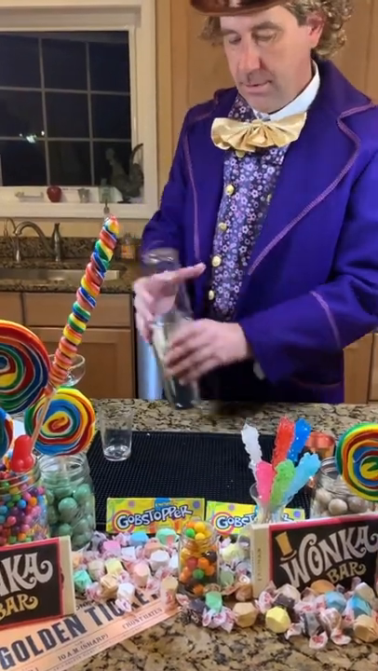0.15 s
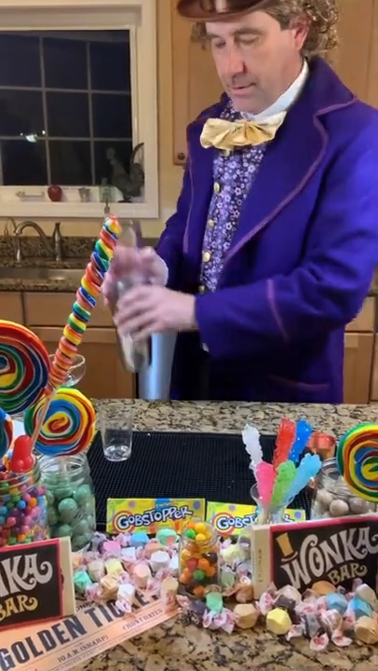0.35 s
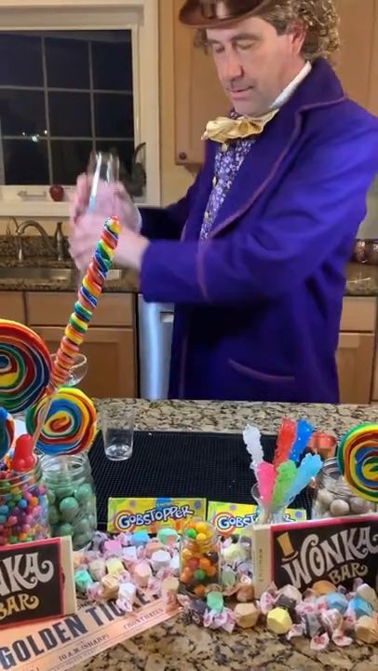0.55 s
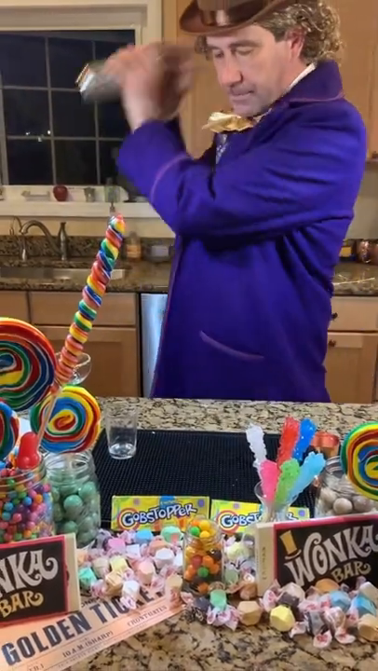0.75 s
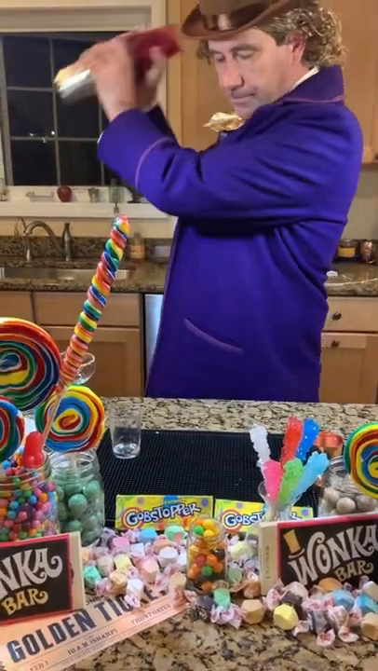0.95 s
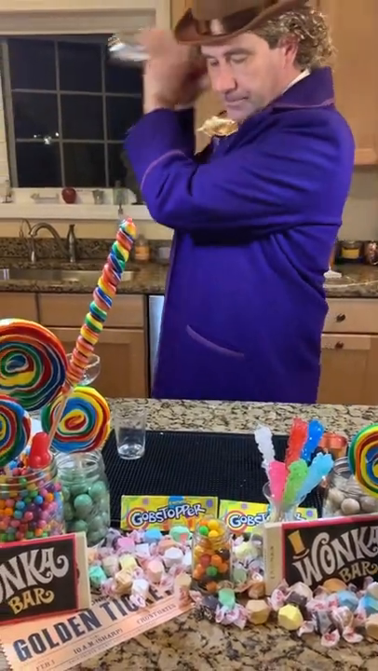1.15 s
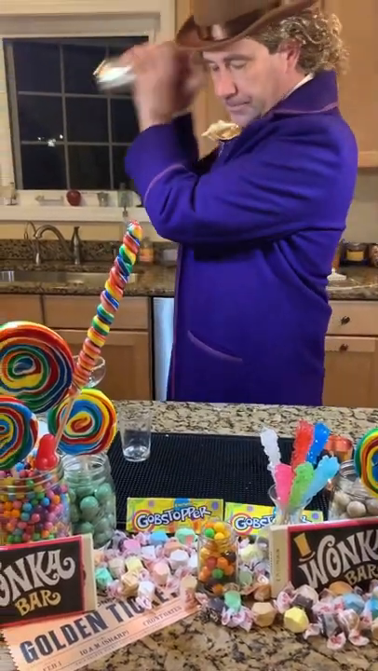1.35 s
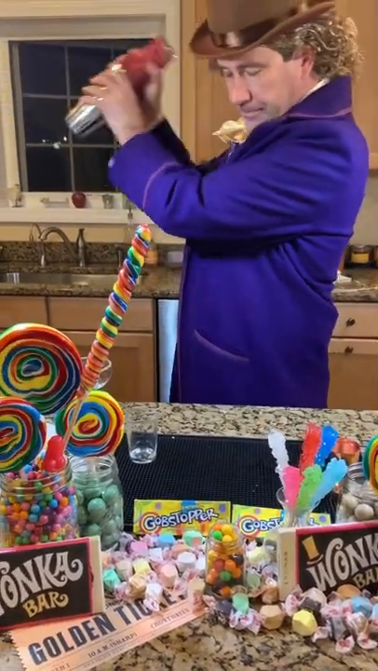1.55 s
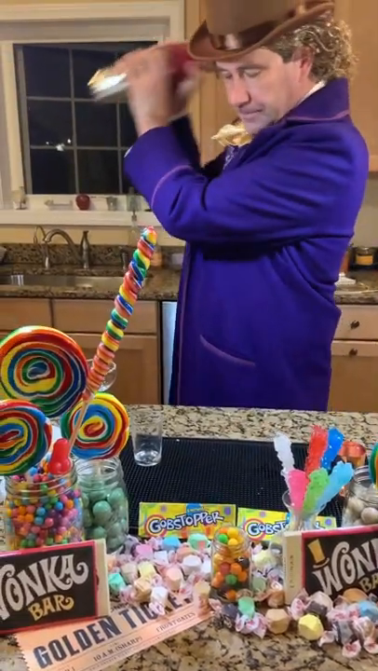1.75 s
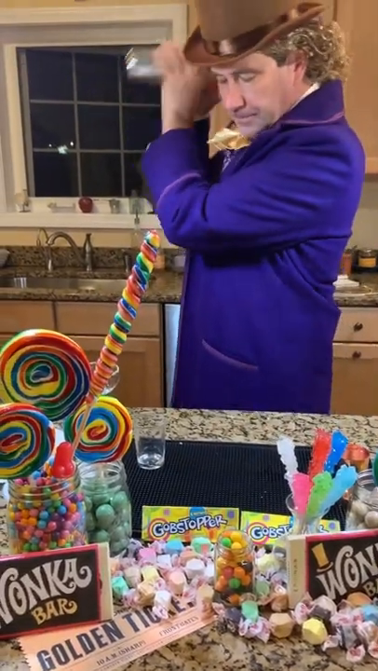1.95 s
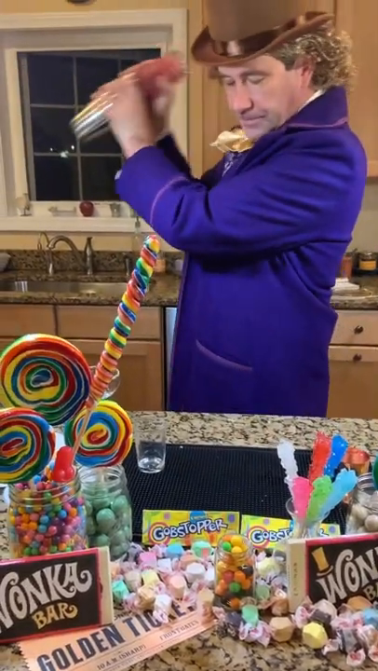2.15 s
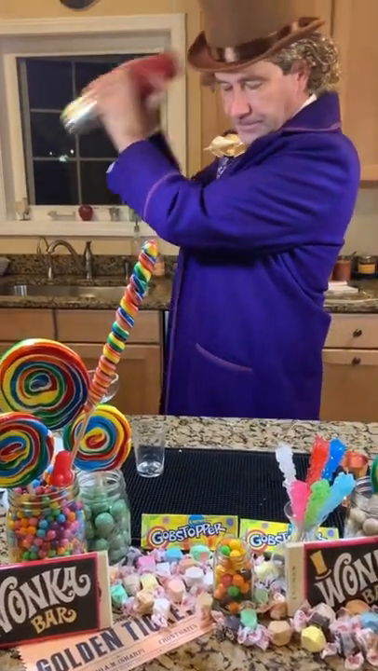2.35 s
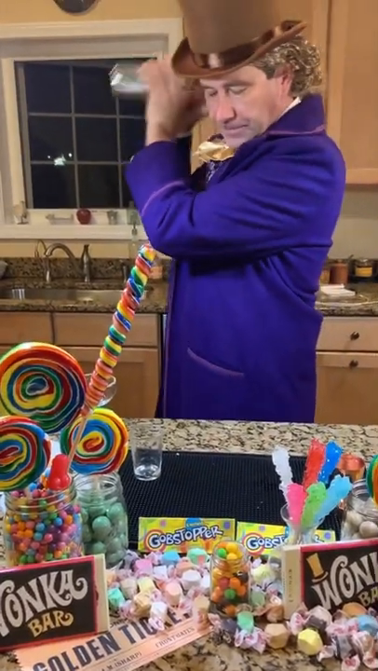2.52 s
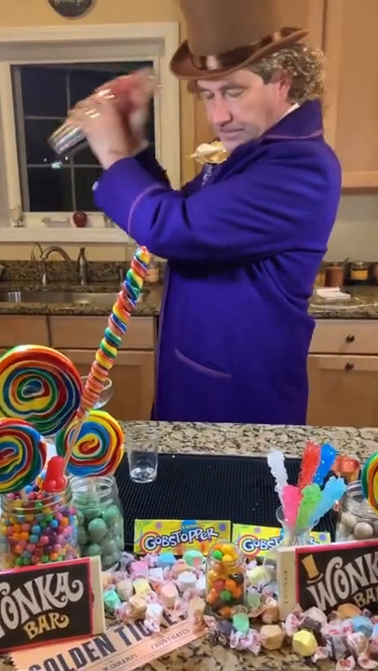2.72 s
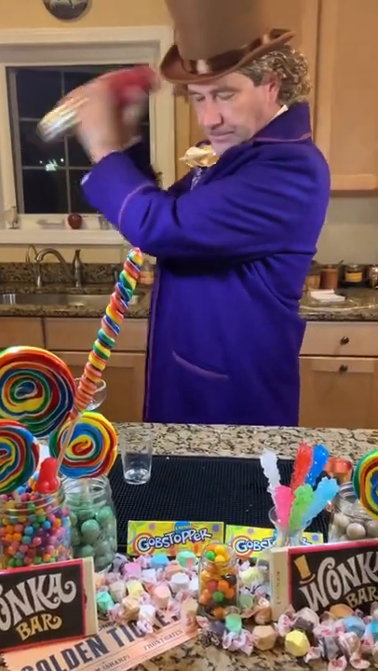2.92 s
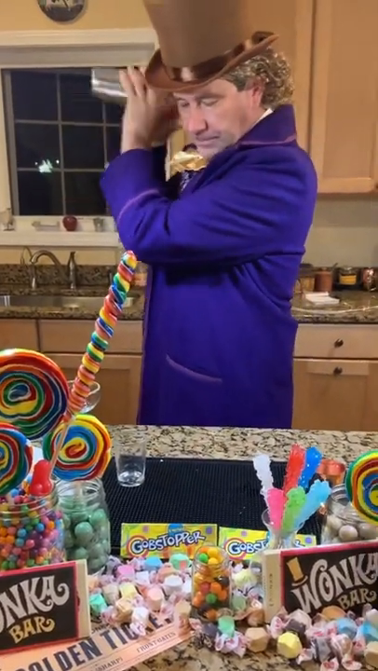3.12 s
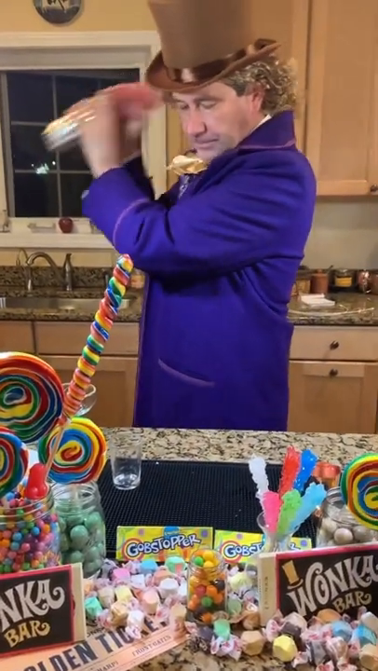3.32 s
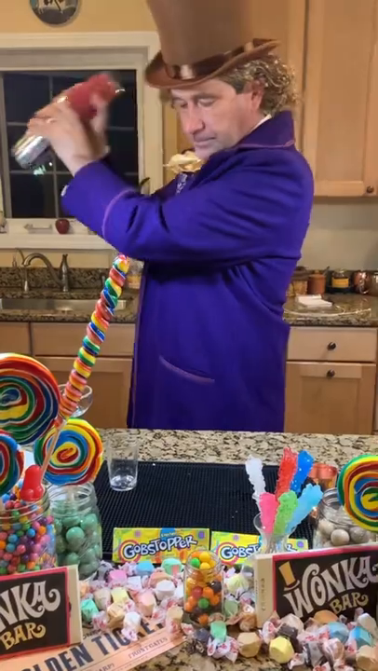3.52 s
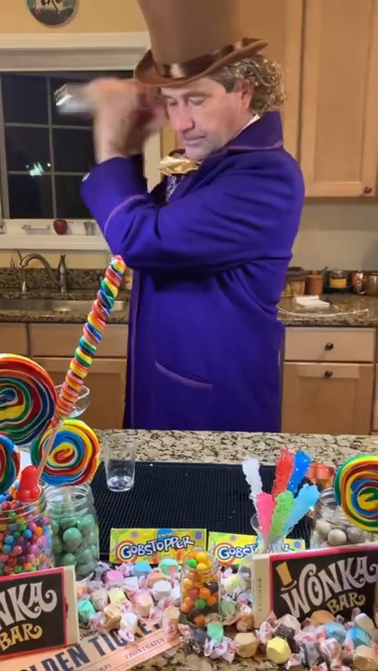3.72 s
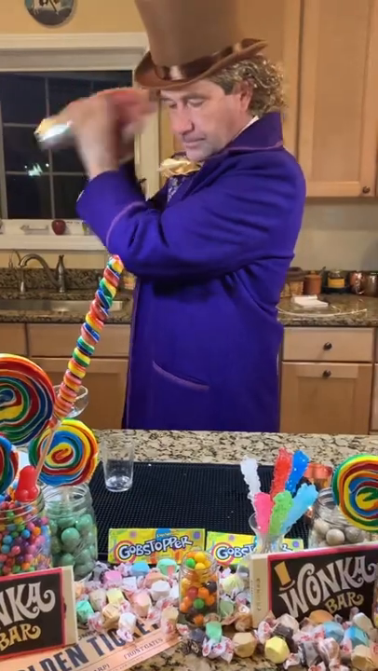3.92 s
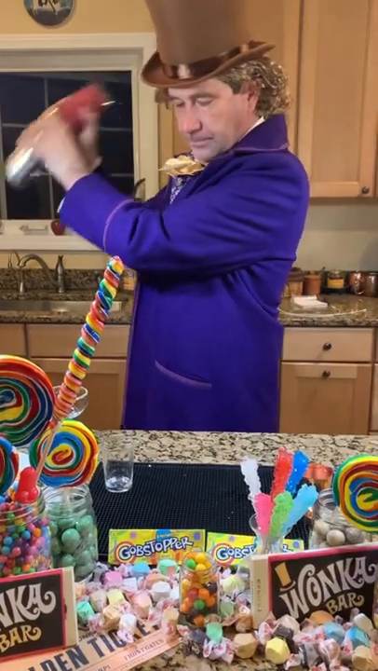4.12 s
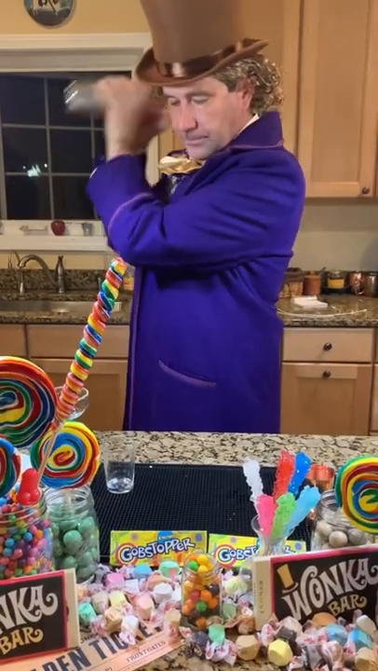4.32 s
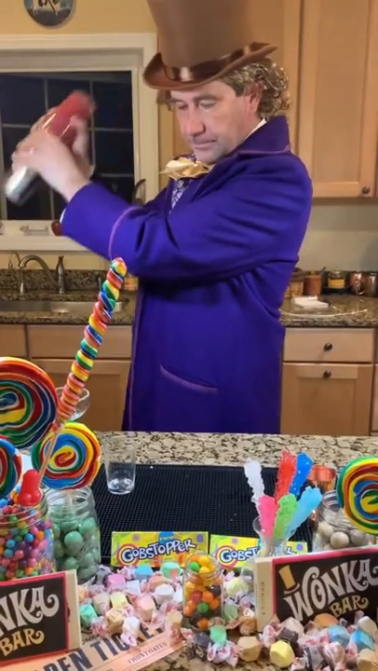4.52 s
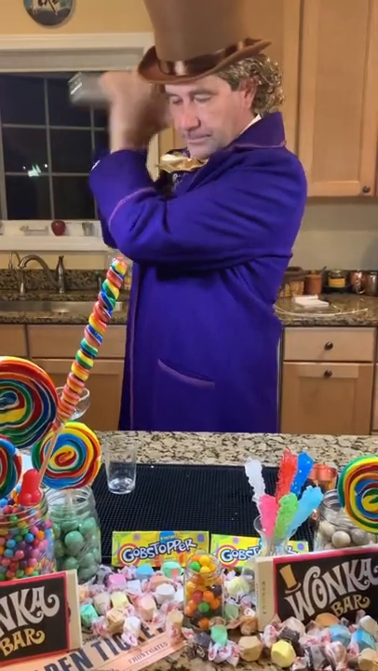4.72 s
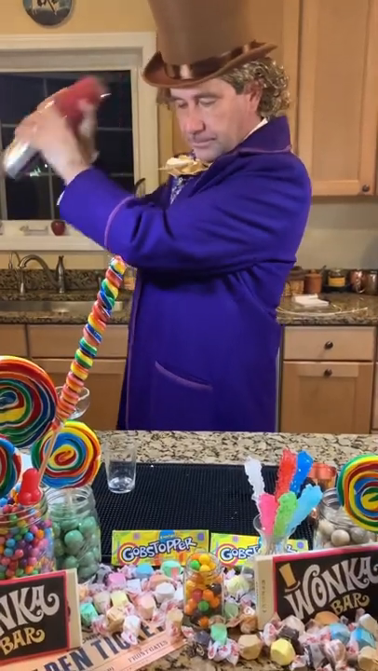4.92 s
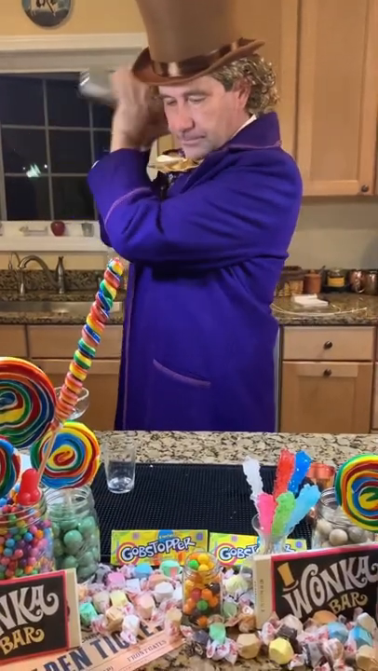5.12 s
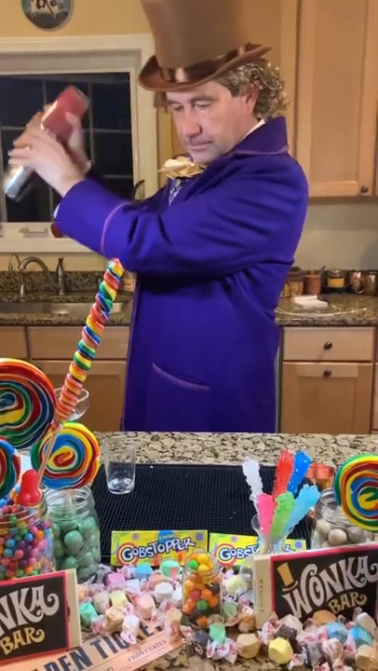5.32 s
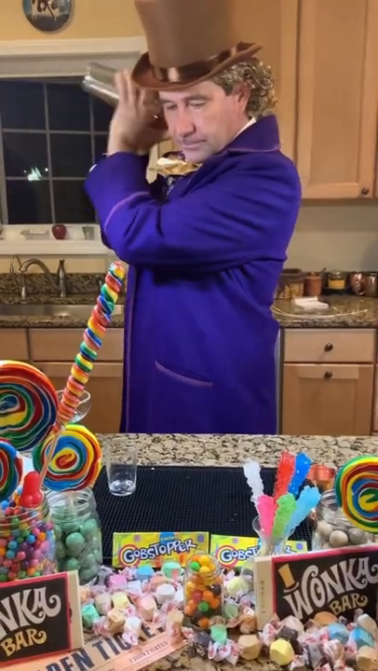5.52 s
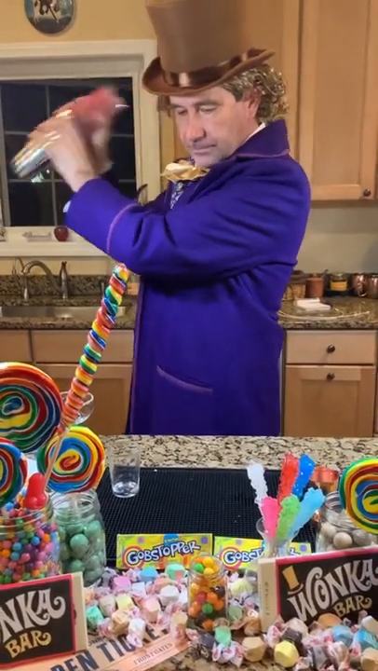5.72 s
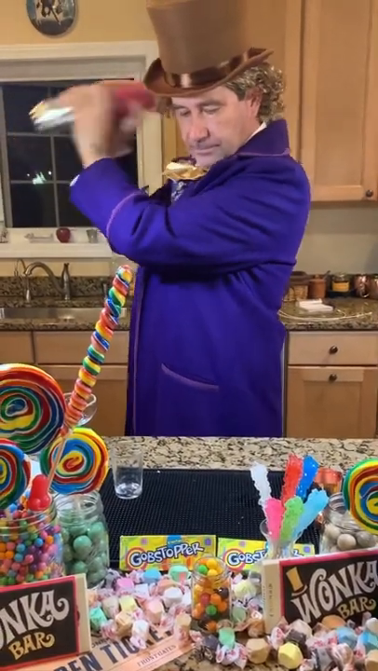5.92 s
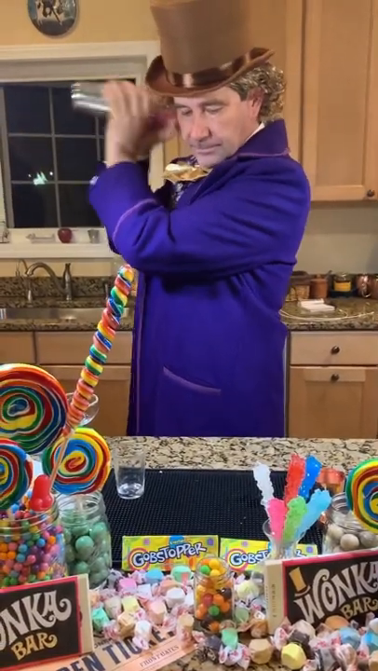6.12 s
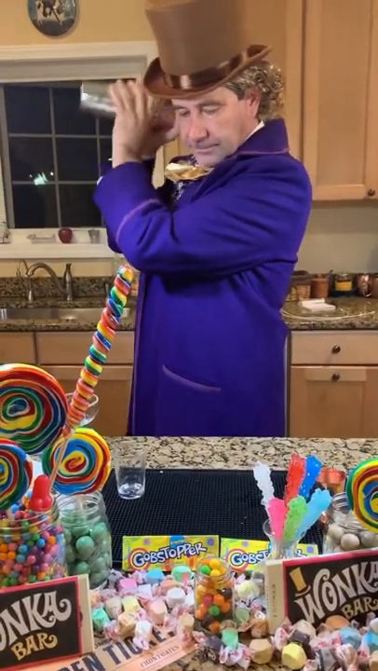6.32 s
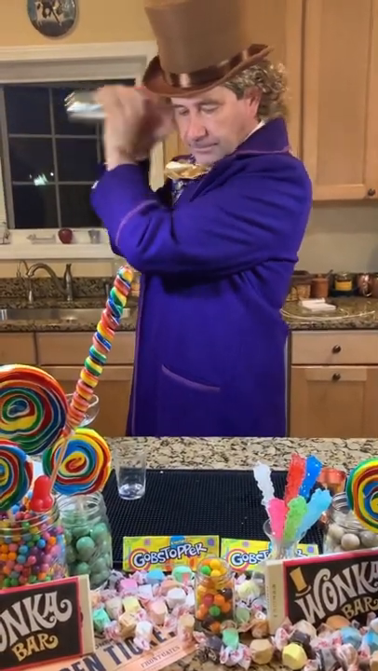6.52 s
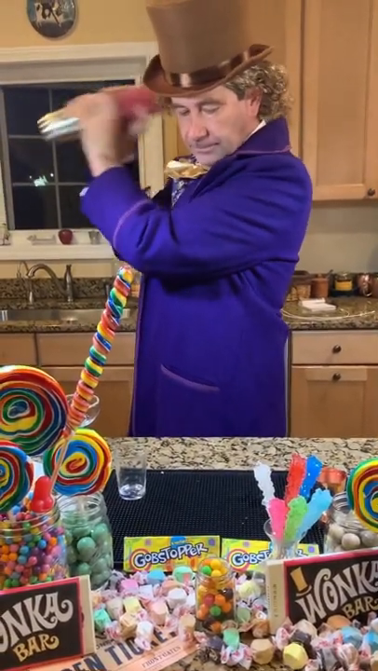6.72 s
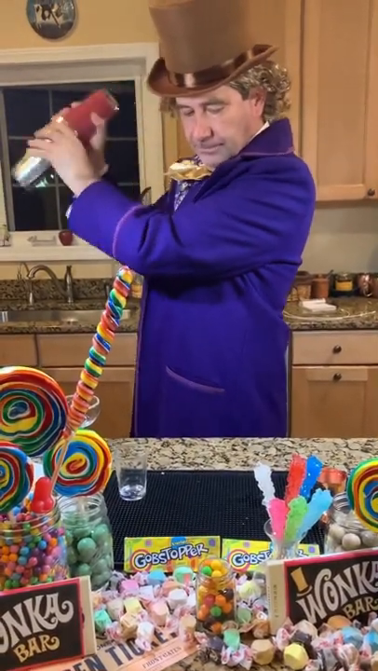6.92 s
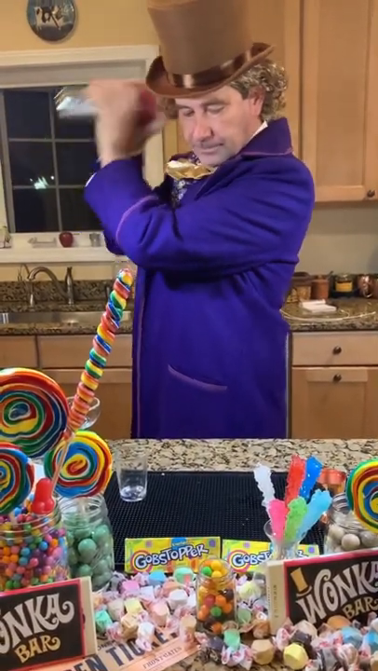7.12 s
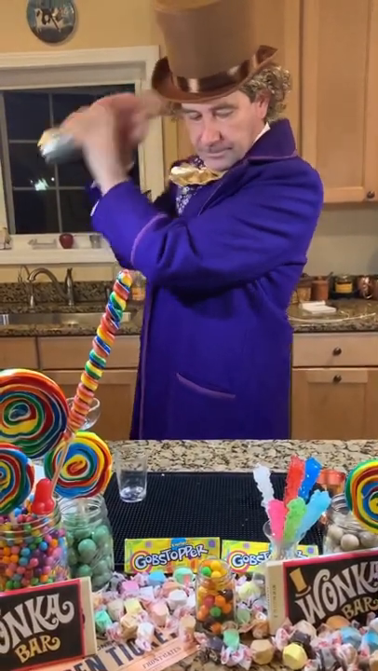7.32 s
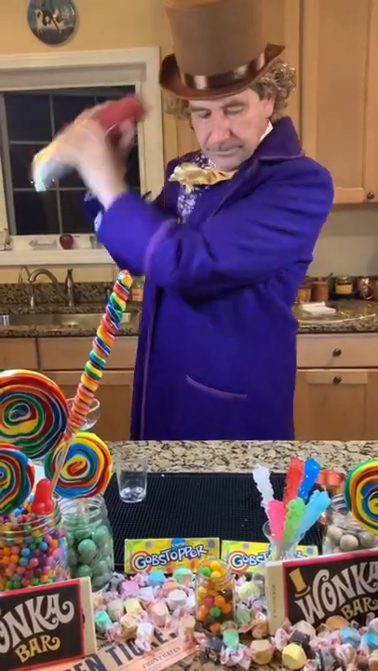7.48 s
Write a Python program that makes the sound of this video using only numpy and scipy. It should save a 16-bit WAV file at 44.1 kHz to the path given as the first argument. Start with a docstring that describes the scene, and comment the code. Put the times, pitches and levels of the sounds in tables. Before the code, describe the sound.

For under a second ice softly rustles and ticks as a metal and glass shaker is lifted from a counter with a dull rub. Then vigorous shaking bursts in: rapid strokes of ice and liquid, alternating bright tin rattle and duller glass knocks, with splashy hiss and clanks. It continues to the end, in a small kitchen with short echoes, heard close on a hand-held stereo microphone, from the left.

```python
"""In a small kitchen, ice cubes and drink are thrown to and fro in a shaker: a steel tin capped by a glass.
First the shaker is lifted and the ice rustles and ticks; then every stroke is a shower of knocks on the walls,
duller when the load lands in the glass, brighter in the tin. Random contacts set the walls, load and chips ringing;
filtered noise makes splash, rumble and echoes. A hand-held stereo microphone hears it from the left."""
import sys
import numpy as np
from scipy import signal
from scipy.fft import rfft, irfft
from scipy.io import wavfile

SR = 44100
rng = np.random.default_rng(int(sys.argv[2]) if len(sys.argv) > 2 else 0)


def generate_wav(signal):
    """Clip the signal to [-1, 1] and save it as 16-bit WAV at the path in sys.argv[1]."""
    frames = np.transpose(np.atleast_2d(signal))
    scaled = np.clip(frames, -1, 1) * 32767
    pcm = np.round(scaled).astype(np.int16)
    wavfile.write(sys.argv[1], SR, pcm)


N = 332955

# colour of fine splash and of cracking ice: f/Hz, relative level/dB
SPLASH_COLOUR = [(2000, -31), (4500, -2), (8000, -1), (10500, 2.5), (12500, -1), (15500, -5.5)]


def from_db(db):
    """Turn decibels into a gain."""
    return 10 ** (np.asarray(db) / 20)


def rms_one(x):
    """Scale a sound to an average strength (rms) of 1."""
    return x / np.sqrt(np.mean(x ** 2) + 1e-20)


def in_time(rows):
    """Join the points of a time table into curves, one value per sample; silent outside the table."""
    s, *columns = np.transpose(rows)
    t = np.arange(N) / SR
    return [np.interp(t, s, column, left=-120, right=-120) for column in columns]


def at_hz(points, hz):
    """Read a spectrum table at any frequency, on a logarithmic pitch axis."""
    table_hz, values = np.array(points).T
    return np.interp(np.log(hz + 1), np.log(table_hz), values)


def colour(x, spectrum):
    """Filter a sound to the given spectrum, with no response before the cause (minimum phase)."""
    log_gain = np.log(from_db(at_hz(spectrum, np.linspace(0, SR / 2, 4097))))
    cepstrum = irfft(log_gain)
    # fold the second half onto the first: this makes the filter minimum phase
    cepstrum[1:4096] *= 2
    cepstrum[4097:] = 0
    response = irfft(np.exp(rfft(cepstrum)))[:4096]
    return signal.oaconvolve(x, response)[:N]


def ring(clicks, hz, t60):
    """A click of size 1 starts a dying cosine of height 1; steady pressure is not radiated."""
    decay = from_db(-60 / (max(t60, .001) * SR))
    w = 2 * np.pi * min(hz, 20000) / SR
    return signal.lfilter([.5, 0, -.5], [1, -2 * decay * np.cos(w), decay * decay], clicks + 1e-18)


def shower(per_s, spread_db):
    """Contacts at random moments, of uneven size and random sign; rms 1."""
    sizes = from_db(spread_db * np.minimum(rng.exponential(1, N), 5)) * rng.choice([-1, 1], N)
    hits = rng.random(N) < per_s / SR
    return rms_one(sizes * hits)


def place(times, gains):
    """Put one click at each time."""
    out = np.zeros(N)
    np.add.at(out, np.round(np.asarray(times) * SR).astype(int), gains)
    return out


def poses(count):
    """The shaker keeps moving: slow weights fade at random among a few positions and sum to one."""
    knots = np.arange(0, N + 4000, 2000)
    picked = rng.integers(0, count, len(knots))
    return np.array([np.interp(np.arange(N), knots, picked == k) for k in range(count)])


def chips(spectrum, per_s, spread_db, cycles, count):
    """Pieces of ice, each ringing briefly at its own pitch, share out a shower of contacts; rms 1."""
    clicks = shower(per_s, spread_db)
    dealt = rng.integers(0, count, N)   # which piece each contact strikes
    pitches = np.geomspace(spectrum[0][0], spectrum[-1][0], count) * from_db(rng.normal(0, 0.26, count))
    out = np.zeros(N)
    for k, hz in enumerate(pitches):
        # a higher piece rings for less time; sqrt(hz) makes up for it
        loudness = from_db(at_hz(spectrum, hz)) * np.sqrt(hz)
        out += loudness * ring(clicks * (dealt == k), hz, cycles / hz)
    return rms_one(out)


def lifting():
    """While the shaker is lifted, ice rustles and slips with a few ticks; gentle wet contacts have no top."""
    # ice shifting in the shaker: t/s, relative level/dB
    settle = [(0.0, -41), (0.03, -44), (0.36, -47), (0.44, -47), (0.63, -47.5), (0.774, -46.5), (0.84, -41)]
    # small ticks of ice: t/s, relative level/dB, f/Hz
    ticks = [(0.034, -24, 5660), (0.0478, -38, 5750), (0.068, -37, 5500), (0.14, -28, 8040),
             (0.171, -25, 5230), (0.209, -34, 5640), (0.2477, -37, 4740), (0.3, -28, 5700),
             (0.319, -37, 5880), (0.3467, -28, 4670), (0.4223, -29, 6570), (0.4653, -16.5, 5900),
             (0.5256, -39, 5400), (0.5425, -36, 2300), (0.56, -29, 5170), (0.642, -15.5, 5600),
             (0.675, -19.5, 6200), (0.7183, -30, 2450)]
    # loudness of the shifting ice by pitch: f/Hz, relative level/dB
    rustle = [(1800, -36), (2200, -15), (2600, -6), (3500, -9.5), (4200, -1.5), (4800, -5), (5600, -1.5),
              (6700, -4), (7500, -9), (10200, -24)]
    level_db, = in_time(settle)
    out = from_db(level_db + 5.5) * chips(rustle, 2500, spread_db=1.4, cycles=75.0, count=70)
    scrape = np.r_[np.hanning(120), np.zeros(900)]   # each tick is a slip of a few ms
    for s, db, hz in ticks:
        slip = from_db(db - 13.5) * scrape * rng.choice([-1, 1], len(scrape))
        start = round(s * SR)
        out[start:start + len(slip)] += ring(slip, hz, 20.0 / hz)
    top_cut = signal.cheby1(10, 1, 10200, fs=SR, output="sos")
    return signal.sosfilt(top_cut, out)


def rumble():
    """House rumble: noise coloured towards the bass, a separate stream for each row of the scene."""
    # colour of the house rumble: f/Hz, relative level/dB
    house = [(15, -30), (25, -19), (45, -4), (80, -15.5), (130, -5), (200, -21), (300, -5), (450, -8),
             (700, -11), (1200, -10.5), (1800, -11.5), (2600, -41)]
    return [from_db(-57) * rms_one(colour(rng.standard_normal(N), house)) for row in range(2)]


def motor_hum():
    """A motor somewhere in the house: steady sine tones."""
    # hum tones: f/Hz, rms level/dB
    tones = [(199.2, -70), (398.4, -75)]
    t = np.arange(N) / SR
    return sum(from_db(db) * rms_one(np.sin(2 * np.pi * hz * t)) for hz, db in tones)


def kitchen(x):
    """Dense noise-like echo tails, one per port and shaker position; bass and treble die at their own rates."""
    positions, bass_t60_s, treble_t60_s, split_hz = 14, 0.18, 0.29, 530
    t = np.arange(SR // 2) / SR
    onset = np.clip(t / 0.0017, 0, 1)   # the echoes build up over 1.7 ms
    white = rng.standard_normal((2, positions, len(t))) * onset
    low = signal.sosfilt(signal.butter(1, split_hz, fs=SR, output="sos"), white)
    tails = low * from_db(-60 * t / bass_t60_s) + (white - low) * from_db(-60 * t / treble_t60_s)
    tails /= np.sqrt(np.mean(np.sum(tails ** 2, axis=-1)))   # unit energy on average
    sent = x * poses(count=positions)
    return signal.fftconvolve(sent[None], tails, axes=2)[..., :N].sum(axis=1)


def booms():
    """Short low booms and bumps of the hands: soft tones that sag in pitch."""
    # booms: t/s, length/s, start f/Hz, end f/Hz, level/dB
    tones = [(0.535, 0.035, 198, 185, -55), (0.607, 0.027, 260, 200, -47), (0.617, 0.054, 85, 60, -50),
             (0.685, 0.04, 180, 155, -53), (1.574, 0.18, 103, 90, -51), (2.65, 0.07, 80, 62, -50),
             (4.16, 0.06, 100, 80, -60), (4.553, 0.053, 150, 105, -44), (4.63, 0.074, 105, 80, -50),
             (4.963, 0.078, 78, 60, -52), (5.554, 0.06, 95, 80, -61), (6.067, 0.07, 70, 55, -50)]
    out = np.zeros(N)
    for s, length, start_hz, end_hz, db in tones:
        size, start = round(length * SR), round(s * SR)
        phase = 2 * np.pi * np.cumsum(np.linspace(start_hz, end_hz, size)) / SR
        out[start:start + size] += from_db(db) * np.hanning(size) * np.sin(phase)
    return out


def counter_rub():
    """The shaker leaves the counter with a dull rub: a short swell of low band-passed noise."""
    start_s, length_s, band_hz = 0.603, 0.125, (90, 380)
    since = np.arange(N) / SR - start_s
    band = signal.butter(2, band_hz, "band", fs=SR, output="sos")
    rub = rms_one(signal.sosfilt(band, rng.standard_normal(N)))
    shape = np.clip(np.minimum(since / 0.012, 2 - 2 * since / length_s), 0, 1)
    return from_db(-60) * rub * shape


def clumps():
    """Cubes arrive in bunches that strike every part at once: quick random swings of level, in dB."""
    knots = np.arange(0, N + SR, SR // 130)   # about 130 swings per second
    return 2.5 * (np.interp(np.arange(N), knots, rng.standard_normal(len(knots))) - .3)


def strokes(ice_share, thud_share, glass_db, tin_db, fade_db_per_s):
    """Level of one layer: the load lets go, slides ever louder, lands and fades; overlaps add in power."""
    # landings, in glass and tin by turns, first a small wind-up:
    # t/s, slide before it/s, then relative levels: wall ring/dB, ice chatter/dB, thud/dB
    landings = [(0.796, 0.02, -46, -50.5, -46), (0.872, 0.055, -25, -25, -39),
                (1, 0.019, -26.5, -28.5, -34), (1.206, 0.073, -27, -26.5, -39.5),
                (1.289, 0.011, -26, -27, -31), (1.466, 0.049, -24.5, -26.5, -37),
                (1.573, 0.013, -25, -28.5, -31), (1.745, 0.058, -27.5, -27, -39.5),
                (1.845, 0.012, -24, -26.5, -29), (2.029, 0.052, -26.5, -27.5, -38),
                (2.163, 0.05, -29, -32.5, -32.5), (2.312, 0.055, -26, -26, -38),
                (2.416, 0.007, -26.5, -28, -29.5), (2.6, 0.045, -24.5, -25.5, -38.5),
                (2.709, 0.026, -27.0, -30, -32.5), (2.894, 0.05, -28, -28, -38),
                (3.016, 0.031, -27, -29.5, -34.5), (3.179, 0.05, -26, -26.5, -36.5),
                (3.294, 0.028, -26.5, -31.5, -33), (3.47, 0.088, -26.5, -27, -38.5),
                (3.575, 0.027, -24.5, -29.5, -32), (3.756, 0.064, -27, -28, -37.5),
                (3.869, 0.019, -25.5, -29.0, -31), (4.055, 0.048, -24.0, -26.5, -35),
                (4.176, 0.016, -25, -28.5, -31.5), (4.426, 0.067, -28.0, -26, -39.5),
                (4.579, 0.027, -26, -31, -31), (4.829, 0.063, -27, -28.5, -42),
                (4.998, 0.086, -28, -32, -35), (5.207, 0.087, -27.0, -27, -40),
                (5.371, 0.06, -24, -30.0, -31.5), (5.562, 0.045, -23, -26.5, -38),
                (5.715, 0.044, -26.0, -28.5, -33.5), (5.897, 0.06, -27.5, -26.5, -38.5),
                (6.02, 0.03, -26, -28, -32.5), (6.163, 0.076, -28.0, -27.5, -42),
                (6.271, 0.029, -26.5, -34.5, -33), (6.374, 0.097, -30.5, -29.5, -41),
                (6.493, 0.016, -26.0, -30.5, -34), (6.593, 0.04, -29.0, -27.5, -41),
                (6.71, 0.034, -31.5, -34, -37.5), (6.832, 0.065, -28, -27.5, -40),
                (6.978, 0.054, -29.5, -33.5, -34.5), (7.142, 0.053, -26.5, -27.5, -38),
                (7.281, 0.021, -28.5, -31.5, -33), (7.465, 0.062, -30.5, -29.0, -45.5)]
    slide_glass_db, slide_tin_db = -5.5, -6.5   # level at the start of a slide, against its peak
    let_go_db_per_s, from_rest_db_per_s = 449, 3500   # steepness of that start
    # a load that has settled below rest_db lets go at once
    rest_db, settling_db_per_s = -43.5, 120
    s, slide, wall_db, ice_db, thud_db = np.array(landings).T[..., None]
    ends = [(glass_db, slide_glass_db), (tin_db, slide_tin_db)]
    added_db, start_db = np.resize(ends, (len(s), 2)).T[..., None]
    t = np.arange(0, N, 64) / SR
    slide = np.maximum(slide, .002)
    peak_db = wall_db + ice_share * (ice_db - wall_db) + thud_share * (thud_db - wall_db) + added_db
    # what remains of the stroke before when the slide starts
    left_db = np.roll(wall_db + settling_db_per_s * s, 1) - settling_db_per_s * (s - slide)
    let_go = np.where(left_db < rest_db, from_rest_db_per_s, let_go_db_per_s)
    swell_db = np.minimum(start_db * (s - t) / slide, start_db + let_go * (t - s + slide))
    shape_db = np.minimum(swell_db, fade_db_per_s * (s - t))
    power = np.sum(from_db(2 * (peak_db + shape_db)), axis=0)
    return np.interp(np.arange(N) / SR, t, 10 * np.log10(power + 1e-12))


def all_knocks(chatter_db, count):
    """Hard cubes on the wall: the loudest, plus random lighter ones mostly where the ice chatters hardest."""
    # loudest knocks: t/s, then relative levels: cube ring/dB, wall ring/dB, crack/dB; pitch of the cube f/Hz
    loudest = [(0.8232, -5, -16.5, -15, 5300), (0.8543, 1, -25, -16, 5050), (0.8659, -17, -33, -10, 5300),
               (0.8791, 4, -10, -6, 5300), (0.9775, -20, -34, -21, 10400), (0.9904, -24, -28, -16, 3820),
               (1.1659, 1, -35, -25, 4640), (1.1827, -1, -38, -14, 9200), (1.1912, -7, -42, -24, 8650),
               (1.2126, -0.5, -37, -26, 5660), (1.2804, -13, -20, -15, 6500),
               (1.2906, -10, -24, -12, 11300), (1.4477, -18, -17, -10.5, 10100),
               (1.5706, -11.5, -14, -10.5, 6900), (1.5801, -9, -10, -18, 5800), (1.7445, 0, -14, -14, 4280),
               (1.8431, -20, -14.5, -14, 4140), (1.9875, -27, -35, -22, 12400), (1.996, 0, -26, -26, 4820),
               (2.2744, -8, -19, -20, 5200), (2.3115, -7, -16, -22, 5540), (2.397, -14, -27, -15, 11200),
               (2.4162, -13, -13, -12, 9880), (2.5868, -3, -13, -12.5, 5450),
               (2.5999, -15, -7.5, -32, 5500), (2.6844, -0.5, -37, -23, 4870), (2.7067, -8, -17, -25, 6900),
               (2.79, -25, -33, -25, 5170), (2.8583, -9, -19, -20, 4030), (2.8993, 1, -34, -29, 4770),
               (2.907, -8, -28, -27, 5940), (2.967, -11, -17, -24, 5600), (2.993, -13, -29, -24, 10900),
               (3.0059, -25, -14, -32, 10800), (3.0542, -9, -17, -16, 10440), (3.1788, 0, -15, -31, 5100),
               (3.2871, -9, -15, -16, 5750), (3.3974, -10, -16, -20, 5400), (3.4374, -6, -13.5, -17, 5630),
               (3.4895, -21, -12, -34, 3600), (3.4644, -24, -16, -37, 4540), (3.5565, -15, -40, -29, 11100),
               (3.5664, -9, -13, -32, 6100), (3.7184, -16, -14, -27, 4670), (3.7668, -21, -20, -15, 12020),
               (3.7727, -1, -31, -14, 4860), (3.8479, -19, -33, -17, 11000), (3.8569, -23, -32, -25, 5800),
               (4.0485, -8, -35, -24, 4900), (4.1585, -18, -26, -30, 5200), (4.1702, -14, -32, -30, 10800),
               (4.3544, -8, -23, -29, 4960), (4.3988, -10, -20, -13, 4800), (4.408, 1.5, -30, -16, 5030),
               (4.4367, -13, -39, -24, 4760), (4.553, -20, -18, -16, 6540), (4.5815, -29, -31, -30, 4610),
               (4.654, -31, -28, -43, 5240), (4.667, -28, -32, -37, 5300), (4.7606, -22, -28, -30, 4240),
               (4.7778, -20, -32, -34, 11180), (4.829, -18, -17, -38, 5400), (4.97, -20, -17.5, -20, 5200),
               (5.002, -25, -15.5, -23, 5370), (5.1229, -14, -35, -26, 4730), (5.1717, -28, -10, -27, 5270),
               (5.1865, -21, -16, -28, 5240), (5.1992, -5, -28, -16, 4840), (5.2235, -12, -27, -33, 5600),
               (5.2938, -22, -28, -10, 11000), (5.3381, -13, -15, -25, 6400),
               (5.4118, -11.5, -15, -21, 5600), (5.5351, -11, -17, -24, 4900), (5.5782, 0, -25, -17, 4740),
               (5.6408, -10, -12.5, -17, 6400), (5.7026, 0, -11, -12, 4900), (5.7555, 5.5, -10.5, -8, 5270),
               (5.7695, -1.5, -33, -27, 6130), (5.8822, 0, -20, -26, 4770), (5.9116, -2, -35, -35, 5940),
               (5.99, -16, -16, -34, 3940), (6.0158, -15, -37, -14, 6500), (6.088, -3.5, -12, -10.5, 5400),
               (6.1475, 2, -15, -7.5, 5400), (6.3437, -20, -17, -14.5, 7000), (6.495, -22, -12, -23, 5130),
               (6.5622, -13, -21, -17, 12300), (6.5878, -2, -31, -28, 5400),
               (6.7864, -11, -17.5, -22, 5100), (6.817, -13, -22, -21, 5250),
               (7.0072, -20, -37, -18, 13000), (7.0923, -21, -17.5, -17, 5300),
               (7.1371, -8, -9.5, -21, 4020), (7.2647, -14, -33, -19, 5000),
               (7.4283, -26, -12.5, -17, 6200)]
    # lighter ones, mean and spread: cube ring, wall ring, crack (dB over the chatter), pitch (Hz)
    mean, spread = (9, -0.5, -12, 5300), (4, 7.6, 2.5, 1100)
    odds = np.cumsum(from_db(chatter_db[:-900]))
    at = np.searchsorted(odds, rng.random(count) * odds[-1])
    light = mean + spread * rng.standard_normal((count, 4))
    light += np.outer(chatter_db[at], [1, 1, 1, 0])
    return np.vstack([loudest, np.column_stack([at / SR, light])])


def body(modes, level_db, per_s, spread_db, times=(), knock_db=None):
    """A shower and hard knocks make every mode (natural tone) ring, each contact with its own strengths."""
    detune, softness = 0.032, .6   # share by which the moving load shifts the modes; yielding of a wet cube
    contacts = from_db(level_db) * shower(per_s, spread_db)
    size = (len(times), len(modes))
    luck = from_db(rng.normal(0, 0.64, size)) * rng.choice([-1, 1], size)
    # divide by the energy of all the rings together, so that the level sets the loudness
    contacts /= np.sqrt(sum(from_db(2 * db) * t60 * SR / (12 * np.log(10)) for hz, db, t60 in modes))
    out, load = np.zeros(N), poses(count=3)
    for k, (hz, db, t60) in enumerate(modes):
        force = contacts * rng.standard_normal(N)
        if knock_db is not None:
            blow = place(times, from_db(knock_db) * luck[:, k])
            force += signal.lfilter([1 - softness], [1, -softness], blow)
        for shift, weight in zip((-1, 0, 1), np.roll(load, k, axis=0)):
            out += from_db(db) * ring(force * weight, hz * (1 + detune * shift), t60)
    return out


def wall_ring(level_db, knock_s, knock_db):
    """The shaker wall, damped by the hands, rings for a few hundredths of a second."""
    # wall modes: f/Hz, relative level/dB, t60/s
    modes = [(1300, -5, 0.023), (1500, -2, 0.013), (1547, -8.5, 0.017), (1670, -1, 0.021),
             (1736, -0.5, 0.018), (1802, -6.5, 0.019), (1916, -15, 0.04), (2154, -11.5, 0.061),
             (2430, -26, 0.012)]
    return body(modes, level_db - 1.0, 500, spread_db=3.5, times=knock_s, knock_db=knock_db - 8.0)


def upper_wall_ring(level_db, knock_s, knock_db):
    """The higher modes of the wall answer a denser shower of contacts."""
    # upper wall modes: f/Hz, relative level/dB, t60/s
    modes = [(2450, 1, 0.015), (2623, -2, 0.017), (2820, -5, 0.014), (2925, -2, 0.029), (3190, 3.5, 0.0069),
             (3555, 1.5, 0.0099), (3450, -15, 0.0068), (3940, -2, 0.019), (4070, -4.5, 0.025)]
    return body(modes, level_db + 3.5, 1000, spread_db=4.0, times=knock_s, knock_db=knock_db - 7.0)


def glass_thud(level_db, knock_s, knock_db):
    """Glass and drink give a duller, lower ring."""
    # modes of glass and drink: f/Hz, relative level/dB, t60/s
    modes = [(350, -21, 0.13), (373, -6, 0.025), (521, 1.5, 0.015), (672, 5, 0.014), (830, -0.5, 0.029),
             (927, -5.5, 0.08), (1205, 8.5, 0.011)]
    return body(modes, level_db - 0.65, 700, spread_db=1.5, times=knock_s, knock_db=knock_db - 13.0)


def hollow_slump(level_db):
    """Load and trapped air boom on the lowest modes."""
    # lowest modes of load and trapped air: f/Hz, relative level/dB, t60/s
    modes = [(63.6, -13, 0.071), (106, -38, 0.034), (141.6, -1.5, 0.076), (203, -12, 0.018),
             (273.3, 5.5, 0.095)]
    return body(modes, level_db - 0.7, 300, spread_db=2.0)


def ice_chatter(level_db):
    """Chips of ice ring at many high pitches."""
    # loudness of the chips by their pitch: f/Hz, relative level/dB
    chip_colour = [(3500, -5), (4500, -40), (5200, 6), (6200, 4), (7300, -0.5), (8500, -6.5), (9500, -89)]
    return from_db(level_db + 4.0) * chips(chip_colour, 4000, spread_db=2.0, cycles=106.0, count=90)


def fine_splash(level_db):
    """Fine splash: a dense shower of tiny contacts, filtered bright."""
    return from_db(level_db + 5.0) * rms_one(colour(shower(6000, 4.3), SPLASH_COLOUR))


def hard_cubes(knocks):
    """Each hard cube gives a short ring at its own pitch and a crack of splintering noise."""
    s, ring_db, crack_db, pitch_hz = knocks[:, [0, 1, 3, 4]].T
    t = np.arange(800) / SR
    grit = rng.choice([-1, 1], N)   # splintering ice: even strength, random sign
    snap = from_db(-2 - 60 * t / 0.0017)   # first instant of a crack, over its tail
    crack_shape = from_db(-60 * t / 0.01) + snap
    cracks = signal.oaconvolve(place(s, from_db(crack_db)), crack_shape)[:N] * grit
    out = from_db(-1.5) * colour(cracks, SPLASH_COLOUR)
    ring_shape = from_db(-60 * t / 0.0036) * (1 - np.exp(-t / 0.00022))   # contact takes a fraction of a ms
    for at, db, hz in zip(np.round(s * SR).astype(int), ring_db, pitch_hz):
        out[at:at + 800] += from_db(db + 3.0) * ring_shape * np.sin(2 * np.pi * hz * t)
    return out


def struck(rows, t60, added_db):
    """Each blow rings at its own pitch after a short rise."""
    out, t = np.zeros(N + 4000), np.arange(4000) / SR
    shape = from_db(added_db - 60 * t / t60) * (1 - np.exp(-t / 0.00054))
    for s, db, hz in rows:
        start = round(s * SR)
        out[start:start + len(t)] += from_db(db) * shape * np.sin(2 * np.pi * hz * t)
    return out[:N]


def tin_clanks():
    """A cube hits the tin squarely and one wall mode sings out."""
    # clanks: t/s, relative level/dB, f/Hz
    blows = [(0.8228, -21, 1570), (0.8602, -8.5, 1555), (0.9889, -12, 1670), (1.0015, -17, 1720),
             (1.182, -12.5, 1670), (1.283, -11, 1630), (1.558, -18, 1710), (1.7387, -14, 1750),
             (1.7736, -19, 1740), (1.828, -18, 1630), (1.844, -27, 1700), (2.2735, -20, 1590),
             (2.2986, -13.5, 1610), (2.3062, -16, 1800), (2.337, -24, 1700), (2.404, -15, 1590),
             (2.5469, -23, 1550), (2.5853, -23, 1720), (2.5986, -19, 1790), (2.6167, -16.5, 1650),
             (2.713, -28, 1790), (2.7888, -17, 1720), (2.8422, -29, 1720), (2.8934, -18, 1670),
             (2.9945, -19, 1810), (3.0079, -14, 1730), (3.0545, -26, 1670), (3.15, -20, 1700),
             (3.3271, -23, 1770), (3.468, -14, 1840), (3.4882, -15, 1600), (3.5476, -15, 1850),
             (3.574, -21, 1860), (3.7284, -19, 1720), (3.7435, -13, 1750), (3.7595, -14, 1800),
             (3.8589, -25, 1790), (3.8649, -17, 1790), (4.0287, -29, 1780), (4.1586, -17, 1810),
             (4.179, -26, 1830), (4.393, -24, 1670), (4.4085, -14.5, 1690), (4.4357, -16, 1700),
             (4.559, -15, 1880), (4.5783, -15, 1770), (4.6526, -17, 1805), (4.7613, -41, 1620),
             (4.8086, -31, 1810), (4.828, -12, 1710), (4.914, -20, 1840), (4.9708, -12, 1770),
             (5.1716, -32, 1700), (5.1866, -21, 1750), (5.2223, -26, 1750), (5.3383, -15, 1900),
             (5.3904, -16.5, 1760), (5.4144, -10, 1710), (5.5341, -15.5, 1550), (5.558, -20, 1730),
             (5.577, -15, 1660), (5.6734, -13, 1750), (5.7026, -26, 1800), (5.755, -27, 1720),
             (6.1153, -17, 1870), (6.1447, -12.5, 1775), (6.191, -22, 1500), (6.263, -17, 1700),
             (6.4822, -11.5, 1610), (6.5802, -15, 1630), (6.699, -15.5, 1540), (6.7768, -27, 1650),
             (6.814, -18, 1530), (6.853, -19, 1790), (6.9282, -18.5, 1700), (7.0973, -16, 1760),
             (7.4208, -29, 1590)]
    return struck(blows, t60=0.024, added_db=0)


def end_thumps():
    """The load slaps the end of the shaker with a short, lower tone."""
    # thumps: t/s, relative level/dB, f/Hz
    blows = [(0.976, -38, 774), (0.993, -26, 960), (1.028, -26, 797), (1.246, -27.5, 805),
             (1.291, -18, 936), (1.508, -39, 710), (1.572, -17, 890), (1.736, -25, 730), (1.841, -19, 891),
             (1.86, -20.5, 920), (1.897, -28, 664), (2.036, -31, 780), (2.1, -35, 999), (2.152, -21.5, 890),
             (2.305, -30, 700), (2.416, -22, 960), (2.454, -26, 818), (2.681, -31, 934), (2.704, -23, 921),
             (3.007, -19, 840), (3.15, -26, 790), (3.246, -26, 955), (3.28, -21.5, 910), (3.517, -32, 890),
             (3.545, -27, 980), (3.567, -19, 825), (3.817, -35, 830), (3.848, -30, 750), (3.867, -23, 940),
             (4.125, -31, 970), (4.158, -36, 830), (4.23, -29, 824), (4.395, -30, 695), (4.554, -30, 920),
             (4.851, -32, 770), (4.913, -34, 830), (4.968, -24, 930), (4.993, -21.5, 910),
             (5.024, -29, 830), (5.073, -31, 780), (5.294, -29, 830), (5.338, -23, 970),
             (5.363, -25.5, 610), (5.638, -39, 930), (5.691, -22, 1040), (5.717, -20.5, 817),
             (5.748, -27, 830), (5.991, -25, 724), (6.015, -20, 780), (6.136, -29, 770), (6.191, -29, 810),
             (6.473, -26.5, 800), (6.941, -33, 534), (7.269, -38, 830), (7.284, -28, 666)]
    return struck(blows, t60=0.02, added_db=7)


def rim_pings():
    """A cube finds the free rim of the glass, which rings at one pitch."""
    # pings: t/s, peak level/dB
    hits = [(1.5551, -25), (1.8355, -25), (2.0111, -19), (2.26, -31), (2.4002, -28), (2.6801, -30),
            (3.1465, -30), (3.5481, -24), (3.8489, -22.5), (4.0245, -24), (4.1682, -13), (4.5533, -18),
            (4.9664, -24), (5.3176, -18.5), (5.7546, -24), (5.8474, -24), (5.9895, -28), (6.2634, -21),
            (6.3407, -29), (6.5597, -23), (6.7987, -39), (7.1504, -29), (7.2651, -22)]
    s, db = np.transpose(hits)
    return ring(place(s, from_db(db)), hz=2118, t60=0.059)


def sources():
    """Add up the ice, drink and walls; all layers of the rattle follow the same strokes and bunches."""
    # layers: share from ice column/0-1.5, share from thud column/-0.3-1,
    # added in the glass/dB, added in the tin/dB, fading/(dB/s)
    layers = dict(wall=(0, 0, -1, -1.5, 130), thud=(0, 1, 1.1, 1.1, 98), chatter=(1.5, 0, -2, -5, 159.5),
              upper=(1.13, -0.26, -4.5, -5, 104), splash=(1.1, 0.57, -4.5, -5, 168),
              slump=(0.44, 0.63, -11, -12.5, 186))
    bunched_db = clumps()
    level = {name: strokes(*rule) + bunched_db for name, rule in layers.items()}
    knocks = all_knocks(level["chatter"], count=85)
    knock_s, knock_db = knocks[:, [0, 2]].T
    # which end the load is in: the thud is weaker in the tin
    dullness_db = (level["thud"] - level["wall"])[np.round(knock_s * SR).astype(int)]
    out = lifting()
    out += wall_ring(level["wall"], knock_s, knock_db)
    out += upper_wall_ring(level["upper"], knock_s, knock_db)
    out += glass_thud(level["thud"], knock_s, knock_db + np.minimum(dullness_db, 0))
    out += hollow_slump(level["slump"])
    out += ice_chatter(level["chatter"]) + fine_splash(level["splash"]) + hard_cubes(knocks)
    return out + tin_clanks() + end_thumps() + rim_pings()


def scene():
    """Row 0 reaches the left port; row 1 is the part of the sound that only the right port gets."""
    shaker = sources()
    room = kitchen(shaker)
    left = shaker + booms() + counter_rub() + motor_hum() + from_db(-2) * room[0]
    right_only = from_db(3.0) * room[1]
    return np.array([left, right_only]) + rumble()


def record(dry):
    """The right port repeats the left: in step in the bass, turned in phase above; peaks rounded, ends cut."""
    # share of the left sound that the right port repeats: f/Hz, share/0-1
    shared = [(25, 0.97), (60, 0.92), (250, 0.95), (400, 0.69), (650, 0.24), (2800, 0.5), (3600, 0.74),
              (4500, 1), (16000, 1)]
    # phase of the right port against the left: f/Hz, phase/rad
    phase_turn = [(350, 0), (600, -1.), (800, 0), (1100, -2.8), (1800, -6.), (2400, -9.3), (3300, -8.),
                  (4700, -9.43)]
    port_lag_s, low_cut_hz, high_cut_hz = .0002353, 45, 15750
    hz = np.arange(N // 2 + 1) * SR / N
    share = np.clip(at_hz(shared, hz), 0, 1)
    # above the last point of the table the right port simply lags
    lag = 2 * np.pi * port_lag_s * np.maximum(hz - phase_turn[-1][0], 0)
    turn = np.interp(hz, *np.transpose(phase_turn)) - lag
    left, own = rfft(dry)
    right = irfft(share * left * np.exp(1j * turn) + np.sqrt(1 - share ** 2) * own, N)
    low_cut = signal.butter(3, low_cut_hz, "high", fs=SR, output="sos")
    pair = signal.sosfilt(low_cut, np.array([dry[0], right]))
    pair = .66 * np.tanh(pair / .66)   # round the peaks
    high_cut = signal.ellip(12, .3, 75, high_cut_hz, fs=SR, output="sos")
    return signal.sosfilt(high_cut, pair)


dry = scene()
out = record(dry)
generate_wav(out)
```